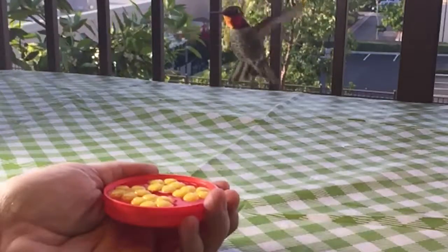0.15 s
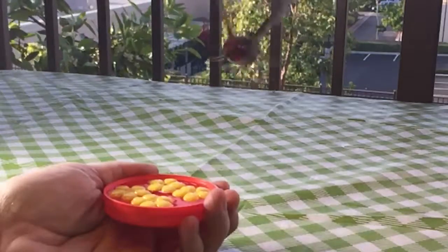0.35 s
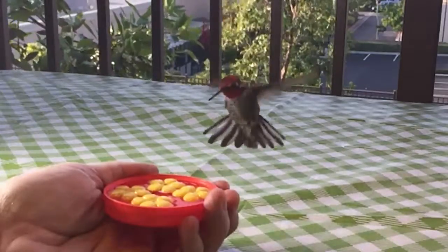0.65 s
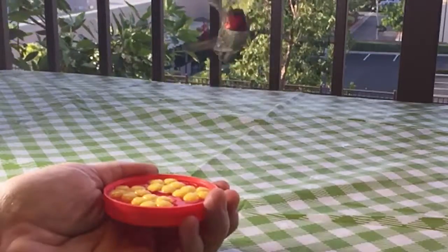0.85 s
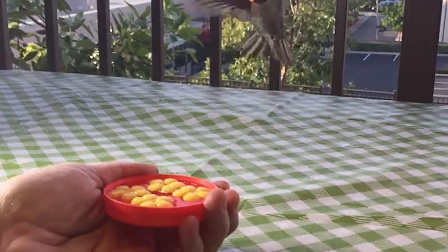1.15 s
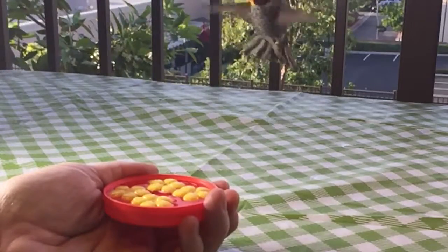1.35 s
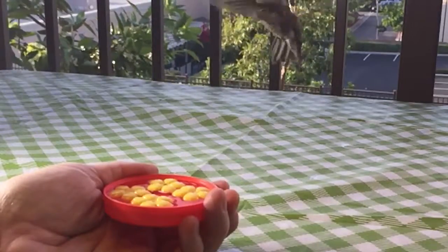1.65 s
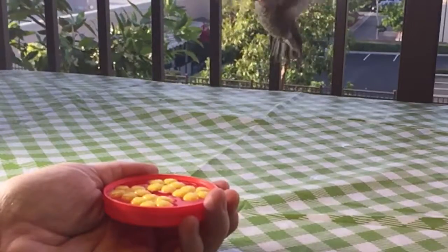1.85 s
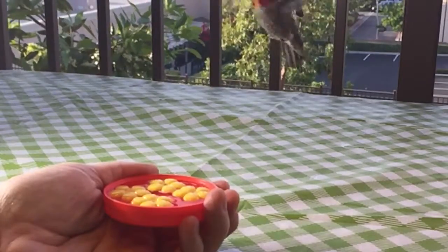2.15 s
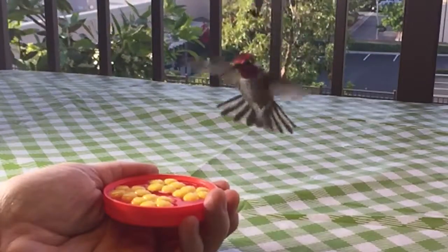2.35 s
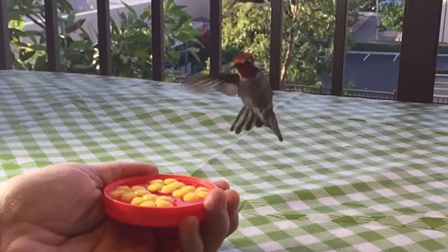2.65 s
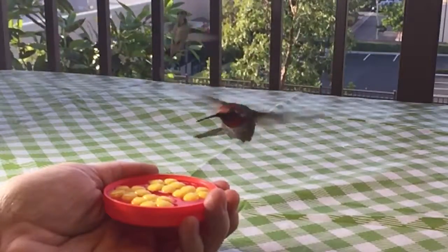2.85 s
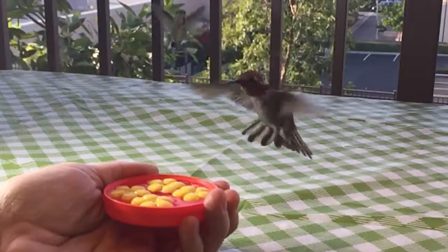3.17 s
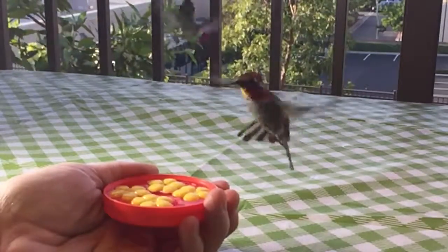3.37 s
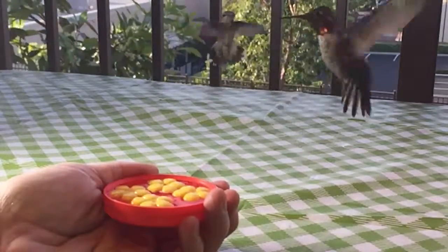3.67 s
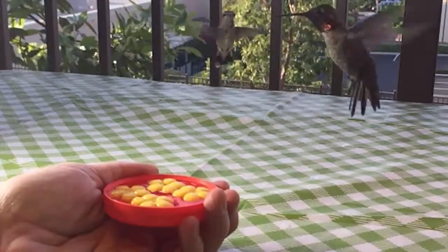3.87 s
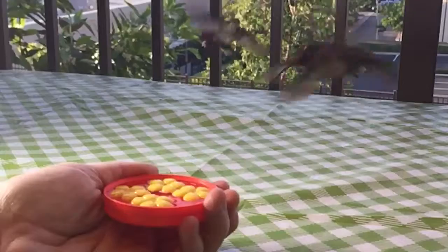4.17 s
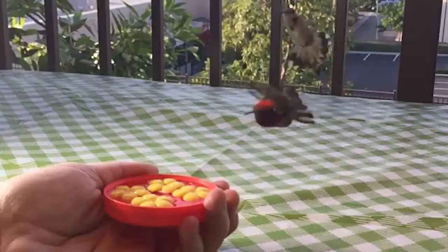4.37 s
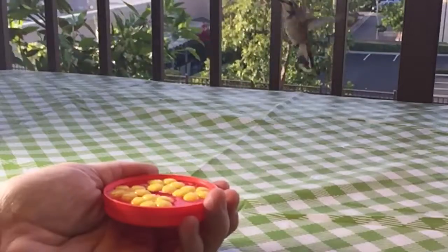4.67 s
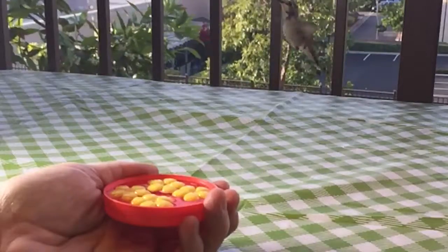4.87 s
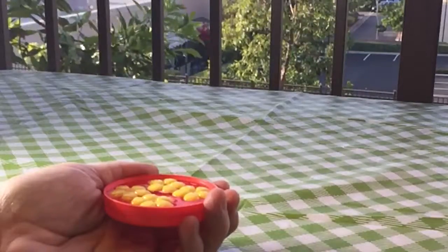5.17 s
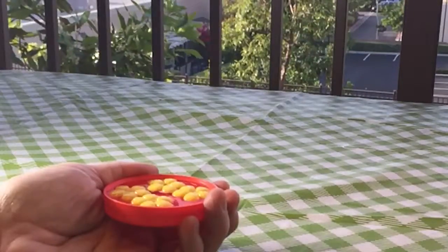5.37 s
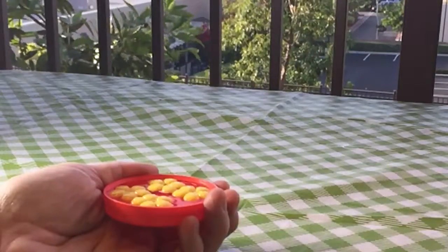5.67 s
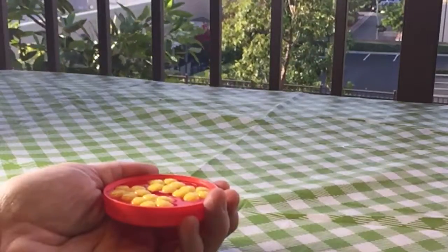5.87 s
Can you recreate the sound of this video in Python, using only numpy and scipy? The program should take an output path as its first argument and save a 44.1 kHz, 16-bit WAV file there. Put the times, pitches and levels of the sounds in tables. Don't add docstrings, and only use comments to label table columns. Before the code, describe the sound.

Two hovering hummingbirds give piercing split-second chips and bursts of low wing hum, loudest in a fluttering scuffle, above a soft street rumble and distant drone.

```python
import sys
import numpy as np
from scipy import signal
from scipy.fft import rfft, irfft, next_fast_len
from scipy.io import wavfile
from scipy.ndimage import uniform_filter1d, map_coordinates

SR = 44100
rng = np.random.default_rng(int(sys.argv[2]) if len(sys.argv) > 2 else 0)


def file_out(sig):
    cols = np.atleast_2d(sig).T
    lim = np.clip(cols, -1, 1)
    pcm = np.round(lim * 32767).astype(np.int16)
    wavfile.write(sys.argv[1], SR, pcm)


def ratio_of_db(decibels):
    return 10 ** (np.asarray(decibels, float) / 20)


N = 265305

# time in seconds, level in dB.
TRAFFIC_LEVEL = [(0, -55.5), (1.2, -57), (1.8, -57.5), (2.9, -56.5), (4.0, -56.5), (4.5, -55.5), (4.9, -57),
                 (6.02, -57.5)]
# frequency in Hz, density in dB per Hz.
WASH_SPECTRUM = [(210, -28), (360, 1.5), (500, -10.5), (600, -6.5), (780, -6.5), (1000, -4), (1300, -8.5),
                 (1750, -14), (2100, -20), (3300, -31), (4300, -44), (7000, -120)]
RUMBLE_SPECTRUM = [(15, -47), (28, -21.5), (45, -3), (70, -1), (120, 0), (230, 1.5), (340, -8), (450, -35),
                   (700, -62)]
HISS_SPECTRUM = [(2000, -53), (3300, -4.5), (6000, -3.5), (11000, -6), (15700, -10.5)]
LEAVES_SPECTRUM = [(1800, -30), (2800, -1.5), (4500, -2), (6500, -20.5), (9000, -34)]
# time in seconds, level in dB.
HISS_LEVEL = [(0, -72.5), (1, -74.5), (2, -73.5), (3, -72.5), (4.2, -72.5), (4.9, -75), (5.5, -76.5),
              (6.02, -76)]

# time in seconds, level in dB, second partial over the first in dB.
DRONE_LEVEL = [(0, -47.5, -12.5), (.45, -49, -12.5), (.62, -52.5, -14.5), (.92, -44, 3.5),
               (1.05, -50.5, -7.5), (1.3, -48.5, 6.5), (1.55, -50.5, -6.5), (1.92, -53, -12),
               (2.1, -47.5, 1), (2.3, -53, -11), (2.62, -46.5, -1), (3.15, -52, -6), (3.4, -48.5, 0),
               (3.9, -58, -2.5), (4.62, -44.5, 8.5), (5.06, -51.5, 12.5), (5.5, -51.5, 4.5), (5.9, -47, 11)]
# time in seconds, pitch in Hz.
DRONE_PITCH = [(0, 97.3), (.6, 96.8), (1.3, 94.1), (2, 95.8), (3, 94.9), (6.02, 94.3)]
# multiple of the pitch, level in dB, share of the shift in weight.
DRONE_PARTIALS = [(1, 0, -0.5), (2, 2, 0.47), (3, -14, 0.028), (4, -20.5, 0.81), (5, -28.5, 0.0064)]
# time in seconds, multiple, width in seconds, gain in dB.
AIR_FADES = [(.12, 1, .15, 3), (.1, 2, 0.048, 1.5), (1.6, 1, 0.1, 4.5), (2.15, 1, .12, 1.5),
             (4.44, 1, .04, 13), (4.65, 1, 0.048, 7), (2.33, 1, 0.023, -6), (2.88, 1, .04, -18),
             (3.12, 2, 0.094, -4), (3.95, 1, 0.089, 5), (4.2, 2, .06, -16), (4.72, 2, 0.03, 1),
             (4.85, 2, 0.058, -14), (4.95, 1, 0.027, -13), (5.18, 1, 0.025, -14), (5.52, 2, 0.036, -13),
             (5.7, 1, 0.08, -15)]

# start in seconds, length in ms, start in Hz, end in Hz, level in dB.
SONGBIRD_NOTES = [
    (5.255, 35, 3500, 3450, -76),
    (5.37, 30, 3700, 4150, -76),
    (5.67, 22, 3850, 3700, -73),
    (5.75, 25, 3750, 3650, -76),
    (5.828, 24, 3750, 4150, -69),
]
# frequency in Hz, decay by 60 dB in seconds.
BALCONY_T60 = [(3000, 0.24), (5000, 0.27), (7500, 0.25), (10000, 0.27), (15000, .25)]

# hardest downstroke in seconds, dying away in seconds, thrum in dB,
# feather hiss in dB, beats a second.
MANOEUVRES = [(.558, 0.094, -45.5, -79, 47), (0.784, 0.051, -44, -72, 52.6), (.931, 0.05, -43, -73.5, 47),
              (2.387, 0.11, -46, -76.5, 46.7), (2.868, 0.096, -48, -77, 47), (2.94, 0.089, -44, -79, 42.7),
              (3.576, 0.092, -45.5, -82, 46.5), (3.689, 0.051, -56, -78, 53),
              (4.382, 0.059, -49, -70.5, 62), (4.435, 0.033, -40, -67, 50), (4.537, 0.11, -40.5, -66, 50.8),
              (4.663, 0.1, -45, -72, 49), (5.1, 0.17, -49.5, -80.5, 47), (5.284, 0.065, -45, -84, 52)]
# multiple of the beat, level in dB.
STROKE_HARMONICS = [(1, -9.5), (2, 5.5), (3, -1), (4, 1.5), (5, -5), (6, -7), (7, -10.5), (8, -8.5),
                    (9, -12), (10, -13.5), (11, -18.5), (12, -20.5), (13, -19), (14, -22)]
# time in seconds, gain in dB.
STROKE_ACCENTS = [(.764, 6.5), (.783, 1), (.803, 4), (2.365, 2), (2.387, -0.5), (2.409, 5), (2.918, 7),
                  (3.596, 3.5), (3.619, 5.5), (4.413, 7), (4.435, -5), (4.497, 2.5), (4.455, 6), (4.473, 3),
                  (4.536, 4.5), (4.555, -6), (4.594, 6), (4.613, 4), (4.517, 4), (4.383, 3.5)]
# frequency in Hz, density in dB per Hz.
FEATHER_SPECTRUM = [(880, -36), (1500, 3.5), (2290, -5), (3400, -6.5), (4800, -10), (8920, -10.5),
                    (13700, -18.5), (15600, -18)]
# start in seconds, peak in dB, pitch in Hz.
FEATHER_SNAPS = [(.089, -64, 9000), (.7765, -59, 8000), (.796, -59, 8000), (.924, -58, 7000),
                 (4.3893, -43, 5500), (4.4065, -53, 4000), (4.4245, -54, 4500), (4.449, -54, 10000),
                 (4.4875, -55, 6300), (4.5095, -54, 9000), (4.5265, -54, 7400), (4.549, -51, 4000),
                 (4.5665, -51, 2600), (4.443, -52, 4000), (4.4615, -54, 3500), (4.4715, -56, 9000),
                 (4.586, -54, 6000), (4.594, -53, 4500), (4.604, -56, 7000), (4.674, -58, 2700),
                 (4.694, -59, 5000)]

# start in seconds, length in ms, top in Hz, end in Hz, bend of the fall.
CHIP_FALLS = dict( near=[(0.0, 11.7, 9450, 2900, 2.5), (0.1182, 11.2, 9550, 3700, 2.3),
              (0.4727, 9.3, 10040, 3050, 2.45), (2.3257, 9.8, 10000, 3300, 2.4)],
              scold=[(2.8306, 8.4, 9380, 3300, 1.85), (4.2787, 9.1, 10300, 3250, 1.85)],
              far=[(0.6876, 12.2, 7300, 2900, 3.6), (1.3677, 10.6, 6330, 3500, 3.6),
              (1.9632, 9.4, 6380, 3200, 3.1), (2.6587, 10.4, 7210, 3300, 2.6),
              (3.4622, 9.2, 7280, 3500, 3.1), (4.2885, 10.7, 7100, 3200, 2.7)])
CHIP_EFFORT = dict( near=[(-38, -37, -37, -38, -37, -38, -38, -40, -42),
               (-47, -39, -36, -32, -32, -33, -35, -46, -54), (-34, -30, -29, -26, -24, -30, -27, -32, -32),
               (-35, -34, -34, -28, -21, -22, -26, -30, -35)],
               scold=[(-38, -29, -26, -38, -33, -26, -27, -34, -38),
               (-47, -37, -31, -30, -29, -25, -19, -30, -33)],
               far=[(-62, -58, -53, -52, -50, -48, -48, -50, -53),
               (-48, -47, -51, -50, -47, -45, -51, -48, -55), (-53, -45, -43, -43, -44, -49, -53, -53, -62),
               (-56, -51, -46, -44, -43, -46, -44, -50, -56), (-45, -39, -36, -37, -38, -43, -38, -39, -48),
               (-46, -43, -40, -43, -42, -41, -40, -44, -44)])
# overtone, second voice, table bounce and surroundings, all in dB.
CHIP_TURNS = dict( near=[(-9, -60, -10, 0), (-15, -60, -14, 0), (-9, -60, -13, 0), (-8, -60, -14, -2)],
              scold=[(-6, -11, -13, -2), (-4, -3, -15, -1)], far=[(-11, -60, -12, 6), (-9, -60, -12, 0),
              (-12, -60, -13, 1), (-9, -60, -11, 2), (-5, -60, -14, -1), (-12, -60, -14, 0)])
# opening slide in Hz, breath in dB.
CHIP_VOICES = dict(near=(100, -30), scold=(150, -19), far=(550, -14))
# table bounce in ms, clutter in dB, balcony tail in dB,
# top pitch beamed away from the surroundings in dB.
CHIP_PLACES = dict(near=(2.4, -16, -15.5, 14), scold=(1.7, -16, -16.5, 4), far=(2.2, -11, -13.5, 13))
# frequency in Hz, gain in dB.
BEAK_GAIN = [(2600, -26), (3000, -8), (3250, -1), (4300, 0), (16000, 0)]

# frequency in Hz, gain in dB.
PORT_GAIN = [(4600, 0), (5000, -3), (5400, 0), (6600, 2), (7800, -2), (9300, 1), (10050, 0), (10350, -6),
             (10700, 0), (14800, 0)]
# frequency in Hz, gain in dB.
BAND_LIMIT = [(14800, 0), (15400, -4), (15720, -60)]


def unit(x):
    return x / np.sqrt(np.mean(x ** 2) + 1e-20)


def along(points, hz):
    f, v = np.transpose(points)
    return np.interp(np.log(hz + 1), np.log(f + 1), v)


def curves(rows, t):
    s, *columns = np.transpose(rows)
    return [np.interp(t, s, column) for column in columns]


def bumps(events, t):
    return sum(db * np.exp(-((t - s) / width_s) ** 2) for s, width_s, db in events)


def wobble(rate):
    knots = rng.standard_normal(int(N * rate / SR) + 4)
    return map_coordinates(knots, [np.arange(N) * rate / SR])


def rush(spectrum, patchy_db, size=6):
    z = signal.stft(rng.standard_normal(N + 1024), nperseg=512)[2]
    field = uniform_filter1d(rng.standard_normal(z.shape), size=size, axis=0)
    field = uniform_filter1d(field, size=2 * size, axis=1)
    x = signal.istft(z * ratio_of_db(patchy_db * unit(field)), nperseg=512)[1]
    m = next_fast_len(len(x))
    colour = ratio_of_db(along(spectrum, np.fft.rfftfreq(m, 1 / SR)))
    return unit(irfft(rfft(x, m) * colour, m)[:N])


def add(track, s, x):
    part = track[round(s * SR):][:len(x)]
    part += x[:len(part)]


def balcony_tail():
    hz, t, z = signal.stft(rng.standard_normal(SR // 4), SR, nperseg=128)
    decay = ratio_of_db(-60 * t / along(BALCONY_T60, hz)[:, None])
    h = signal.istft(z * decay, SR, nperseg=128)[1]
    h = h * (1 - np.exp(-np.arange(len(h)) / SR / .005))
    return h / np.linalg.norm(h)


def street():
    t = np.arange(N) / SR
    wash_db = curves(TRAFFIC_LEVEL, t)[0]
    hiss_db = curves(HISS_LEVEL, t)[0]
    mean_db = wash_db.mean()
    rumble_db = mean_db + 1.9 * (wash_db - mean_db)
    wash = ratio_of_db(wash_db + 1.5 + 0.3 * wobble(5)) * rush(WASH_SPECTRUM, patchy_db=1.8, size=2)
    rumble = ratio_of_db(rumble_db + 8.5 + 1.3 * wobble(5.4)) * rush(RUMBLE_SPECTRUM, patchy_db=2.5)
    hiss = ratio_of_db(hiss_db) * rush(HISS_SPECTRUM, patchy_db=.4)
    leaves = ratio_of_db(-77.5 + 1.5 * wobble(10.0)) * rush(LEAVES_SPECTRUM, patchy_db=2.2)
    return wash + rumble + hiss + leaves


def drone():
    t = np.arange(N) / SR
    hz = curves(DRONE_PITCH, t)[0] + .45 * wobble(7)
    phase = 2 * np.pi * np.cumsum(hz) / SR
    level_db, shift_db = curves(DRONE_LEVEL, t)
    strain_db = bumps([(5.51, 0.33, 15.5)], t)
    out = np.zeros(N)
    for k, db, share in DRONE_PARTIALS:
        fades = [(s, width_s, gain) for s, multiple, width_s, gain in AIR_FADES if round(multiple) == k]
        partial_db = level_db + db + 2.0 + share * shift_db + bumps(fades, t)
        if k in (3, 5):
            partial_db = partial_db + strain_db
        shimmer_db = 2.0 * wobble(22)
        out += ratio_of_db(partial_db + shimmer_db) * np.sin(k * phase + k * k + 0.5 * wobble(6.9))
    return out


def songbird():
    out = np.zeros(N)
    for s, ms, from_hz, to_hz, db in SONGBIRD_NOTES:
        u = np.linspace(0, 1, round(ms * SR / 1000))
        phase = 2 * np.pi * np.cumsum(from_hz + (to_hz - from_hz) * u) / SR
        note = ratio_of_db(db) * np.sin(np.pi * u) * np.sin(phase)
        add(out, s, note)
        add(out, s, ratio_of_db(-3) * signal.fftconvolve(note, balcony_tail()))
    return out


def feather_snaps():
    out = np.zeros(N)
    t = np.arange(300) / SR
    for s, db, hz in FEATHER_SNAPS:
        snap = signal.lfilter(*signal.iirpeak(hz, .7, SR), rng.standard_normal(len(t)))
        add(out, s, ratio_of_db(db - 60 * t / .012) * unit(snap))
    return out


def wings():
    build, linger = 0.95, 1.16
    edge_db = 23
    out, air = np.zeros(N), rush(FEATHER_SPECTRUM, patchy_db=3.5)
    uneven, gusty = wobble(45), wobble(160)
    accent_db = bumps([(s, .006, db) for s, db in STROKE_ACCENTS], np.arange(N) / SR)
    for s, dying_s, peak_db, hiss_db, beat_hz in MANOEUVRES:
        part = slice(round((s - 2 * dying_s) * SR), round((s + 2 * dying_s) * SR))
        t = np.arange(N)[part] / SR - s
        slack_db = edge_db * (t / dying_s / np.where(t < 0, build, 1)) ** 2
        thrum_db = peak_db - slack_db
        phase = 2 * np.pi * beat_hz * t + .07 * uneven[part]
        dull = np.clip(-40 - thrum_db, 0, 20) * .06
        thrum = -sum(ratio_of_db(db - dull * k) * np.cos(k * phase + .07 * k * k) for k, db in STROKE_HARMONICS)
        downstroke = .7 * np.exp(5 * (np.cos(phase) - 1))
        upstroke = .6 * np.exp(-5 * (np.cos(phase) + 1))
        puff = .65 + downstroke + upstroke
        puff_db = hiss_db - slack_db / linger ** 2 + 12.0 + 2.2 * gusty[part]
        out[part] += ratio_of_db(thrum_db + 0.5 + .5 * uneven[part] + accent_db[part]) * thrum
        out[part] += ratio_of_db(puff_db) * puff * air[part]
    return out + feather_snaps()


def chip_call(fall, effort_db, over_db, twin_db, scoop_hz, breath_db):
    s, ms, top_hz, end_hz, bend = fall
    u = np.linspace(0, 1, round(ms * SR / 1000))
    hz = top_hz - (top_hz - end_hz) * u ** bend - scoop_hz * np.exp(-u / .1)
    phase = 2 * np.pi * np.cumsum(hz) / SR
    opening = np.sin(np.pi / 2 * np.clip(u / .07, 0, 1)) ** 2
    closing = np.sin(np.pi / 2 * np.clip((1 - u) / .09, 0, 1)) ** 2
    level_db = np.interp(u, np.linspace(0, 1, len(effort_db)), effort_db) + along(BEAK_GAIN, hz)
    overtone_swell = np.clip((u - .5) / .25, .2, 1) * np.clip((hz - 3600) / 1500, 0, 1)
    overtone = ratio_of_db(over_db) * overtone_swell * np.sin(2 * phase)
    gap = 2 * np.pi * np.cumsum(2000 * (1 - u)) / SR
    twin = ratio_of_db(twin_db) * np.clip(1.5 - 2 * u, .1, 1) * np.sin(phase + gap)
    breath = ratio_of_db(breath_db) * signal.lfilter([1, -.7], 1, rng.standard_normal(len(u)))
    return ratio_of_db(level_db) * opening * closing * (np.sin(phase) + overtone + twin + breath)


def near_clutter():
    n = np.arange(700)
    clutter = rng.standard_normal(700) * ratio_of_db(-60 * n / SR / .035)
    return clutter / np.linalg.norm(clutter)


def chips():
    out = np.zeros(N)
    foliage = signal.butter(2, 11500, fs=SR)
    for kind, falls in CHIP_FALLS.items():
        table_ms, clutter_db, tail_db, beamed_db = CHIP_PLACES[kind]
        for fall, effort_db, turned in zip(falls, CHIP_EFFORT[kind], CHIP_TURNS[kind]):
            s = fall[0]
            over_db, twin_db, table_db, around_db = turned
            call = chip_call(fall, effort_db, over_db, twin_db, *CHIP_VOICES[kind])
            u = np.linspace(0, 1, len(call))
            spill = call * ratio_of_db(-beamed_db * np.clip(1 - u / .7, 0, 1))
            muffled = signal.lfilter(*foliage, spill)
            add(out, s, call)
            add(out, s + table_ms / 1000, ratio_of_db(table_db) * spill)
            add(out, s + .0012, ratio_of_db(clutter_db + around_db) * np.convolve(muffled, near_clutter()))
            add(out, s + .001, ratio_of_db(tail_db + around_db) * signal.fftconvolve(muffled, balcony_tail()))
    return signal.lfilter(*signal.butter(4, BEAK_GAIN[0][0], "high", fs=SR), out)


def scene():
    return (street() + drone() + songbird() + wings() + chips())[None]


def roll_off(x):
    return signal.sosfilt(signal.butter(12, 15740, fs=SR, output="sos"), x)


def record(dry):
    hz = np.fft.rfftfreq(N, 1 / SR)
    cepstrum = irfft(np.log(ratio_of_db(along(PORT_GAIN, hz))), N)
    folded = cepstrum * np.r_[1, 2 * (np.arange(1, N) < N / 2)]
    port = np.exp(rfft(folded))
    kept = irfft(rfft(dry) * port * ratio_of_db(along(BAND_LIMIT, hz)), N)
    fade = np.clip(np.arange(N)[::-1] / SR / .003, 0, 1)
    return roll_off(kept * fade)


dry = scene()
out = record(dry)
file_out(out)
```